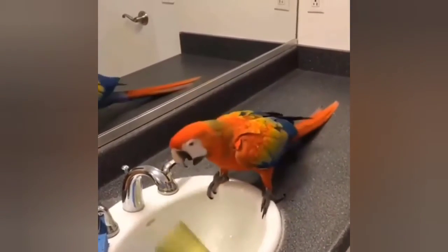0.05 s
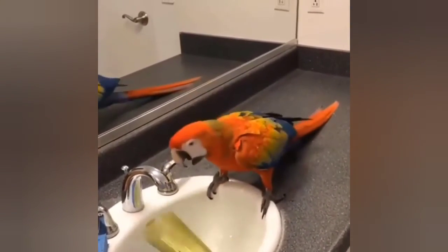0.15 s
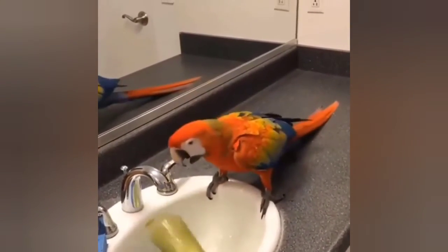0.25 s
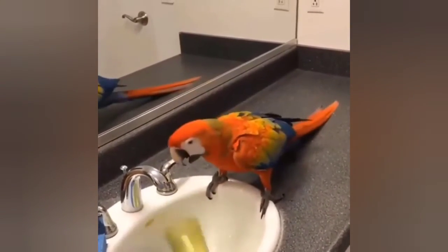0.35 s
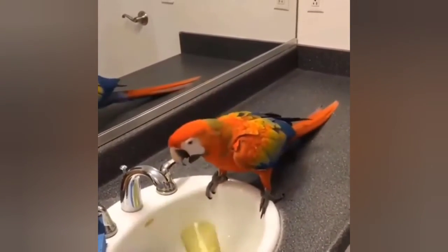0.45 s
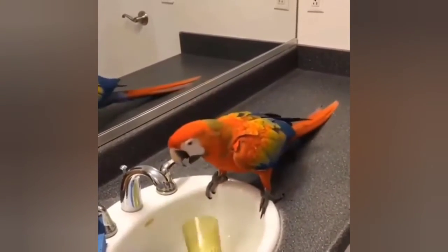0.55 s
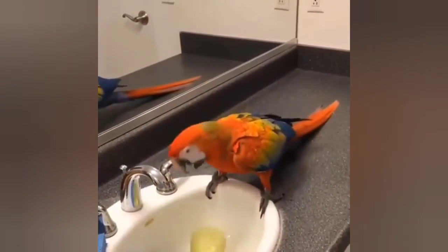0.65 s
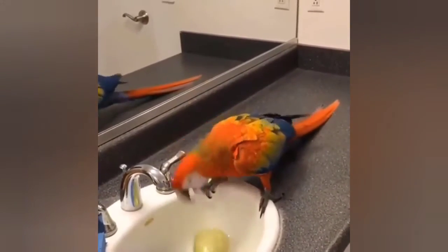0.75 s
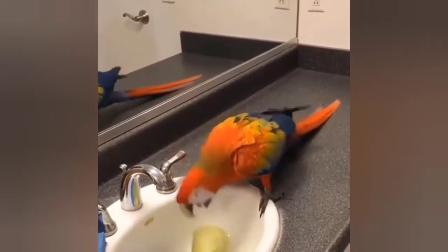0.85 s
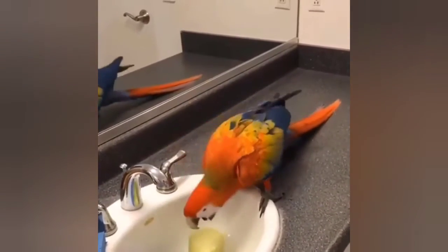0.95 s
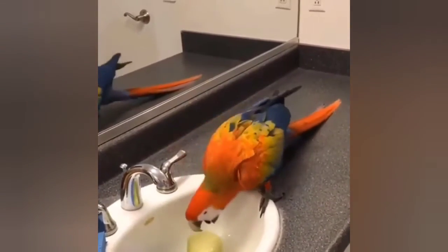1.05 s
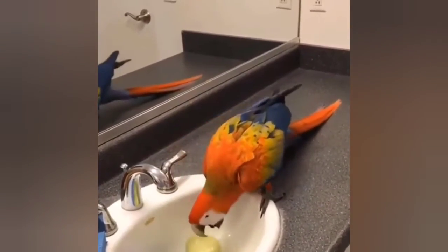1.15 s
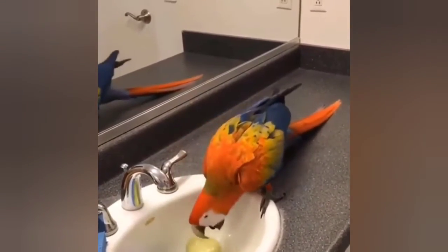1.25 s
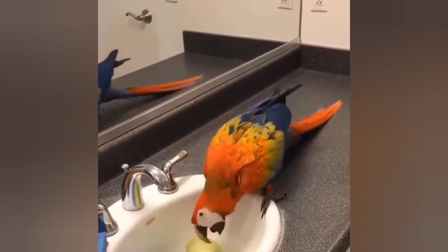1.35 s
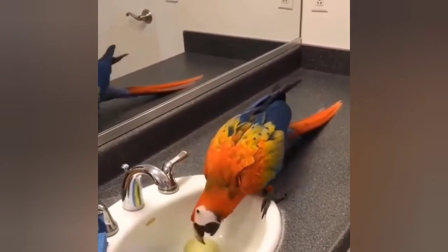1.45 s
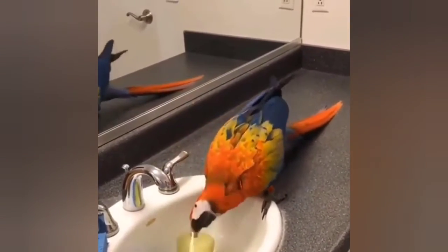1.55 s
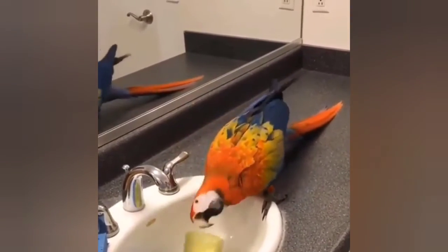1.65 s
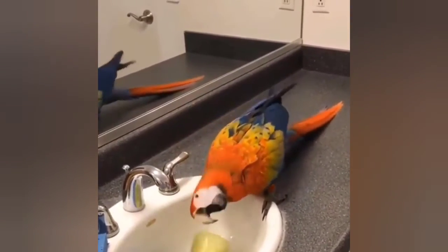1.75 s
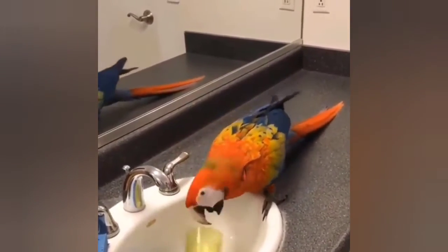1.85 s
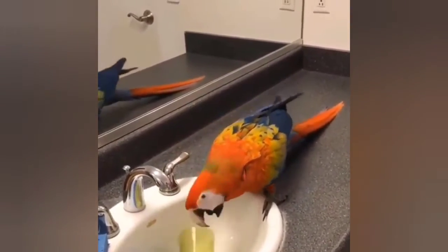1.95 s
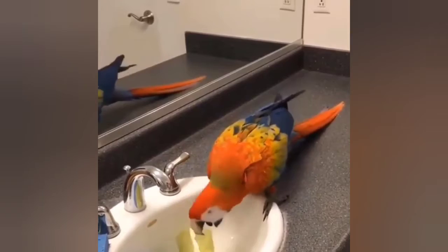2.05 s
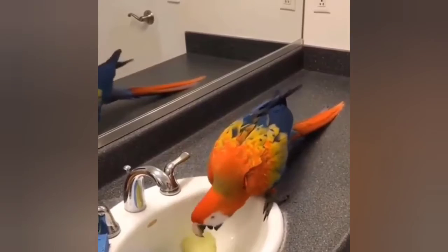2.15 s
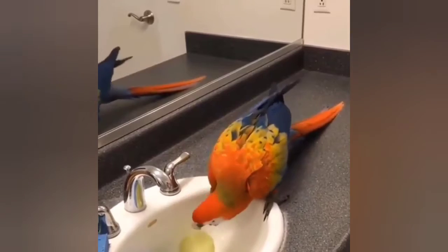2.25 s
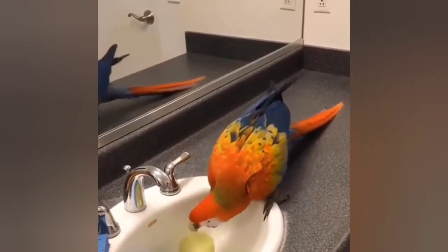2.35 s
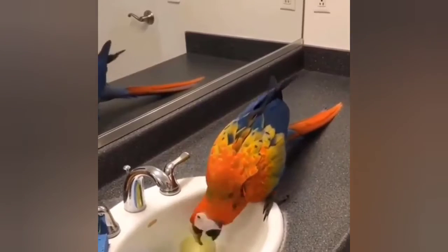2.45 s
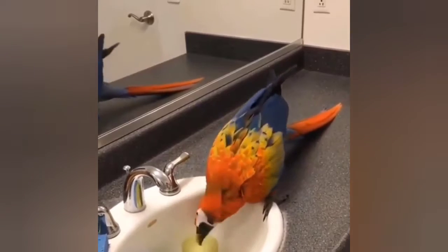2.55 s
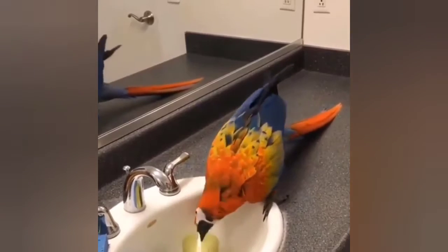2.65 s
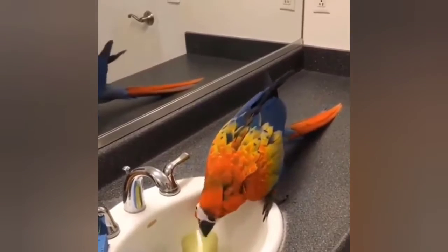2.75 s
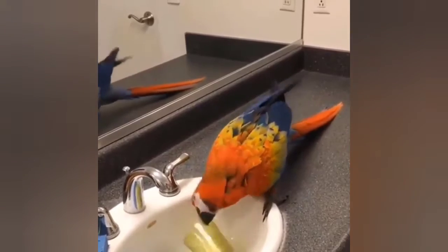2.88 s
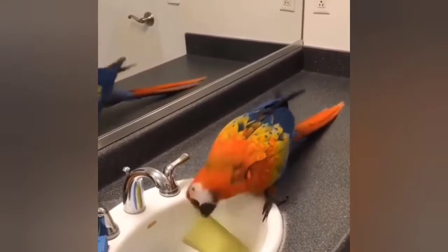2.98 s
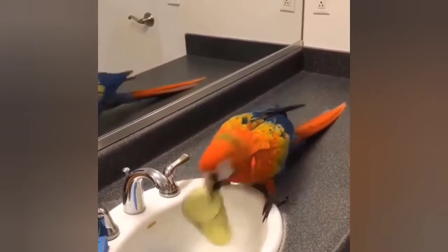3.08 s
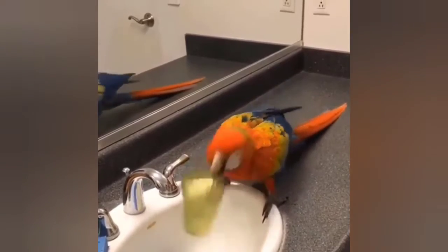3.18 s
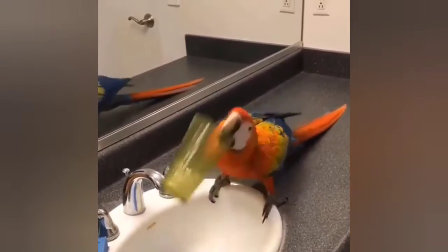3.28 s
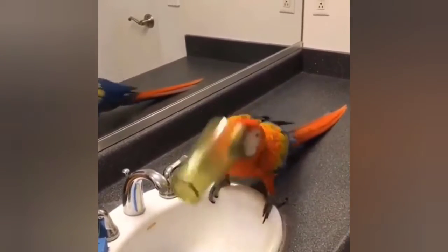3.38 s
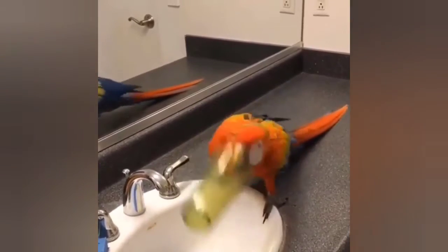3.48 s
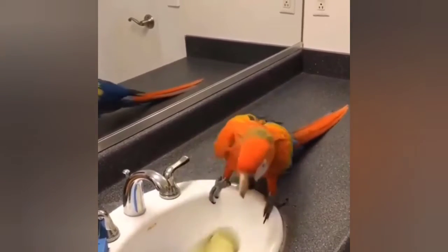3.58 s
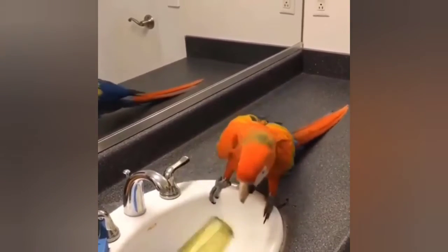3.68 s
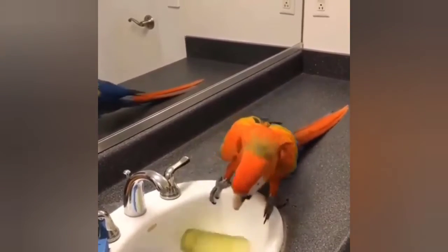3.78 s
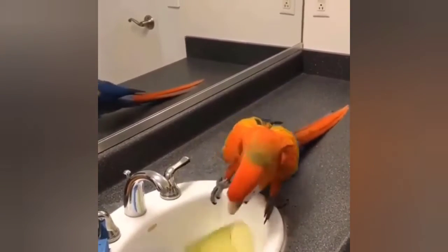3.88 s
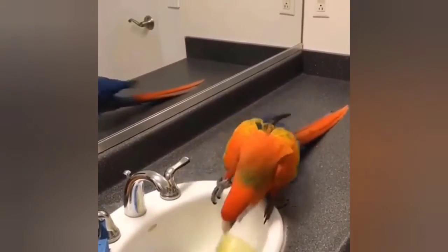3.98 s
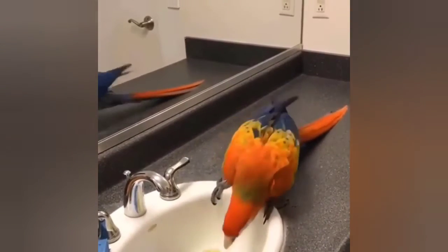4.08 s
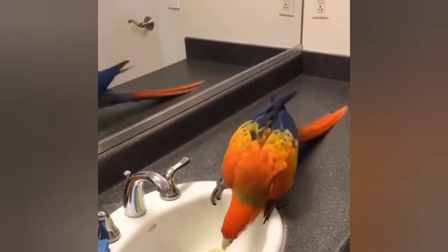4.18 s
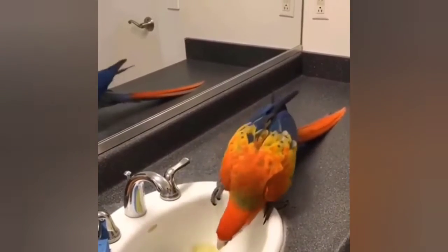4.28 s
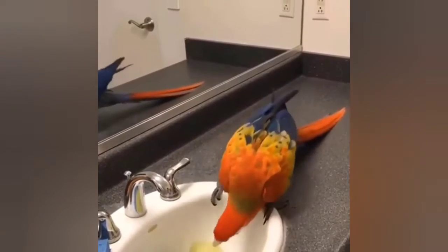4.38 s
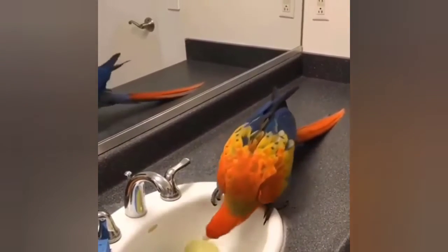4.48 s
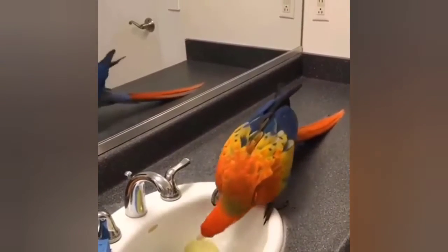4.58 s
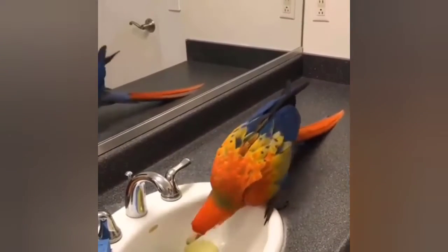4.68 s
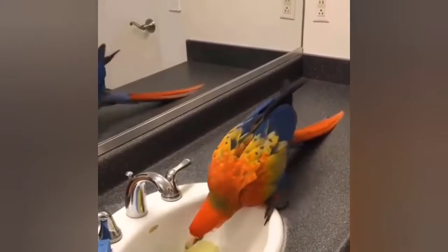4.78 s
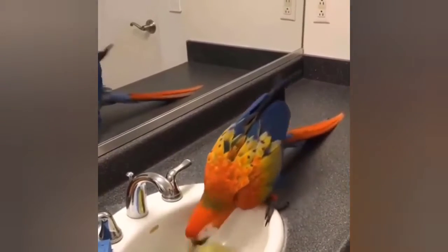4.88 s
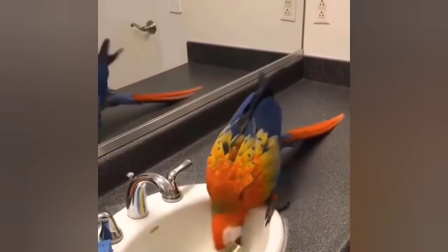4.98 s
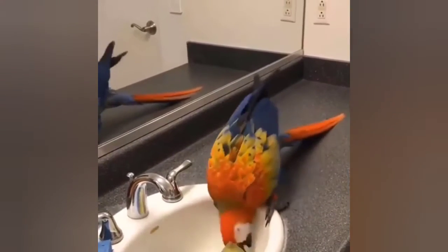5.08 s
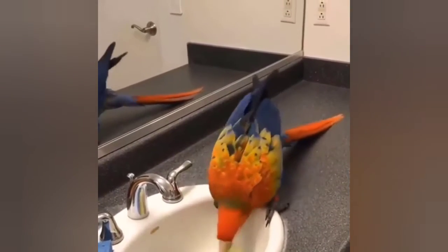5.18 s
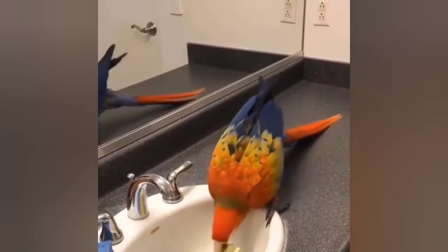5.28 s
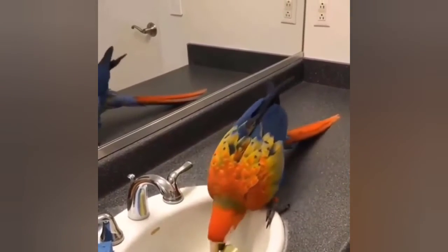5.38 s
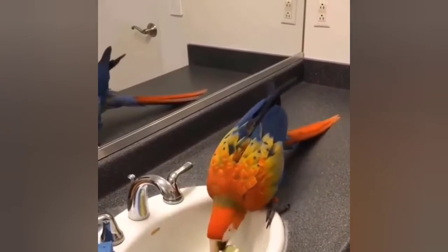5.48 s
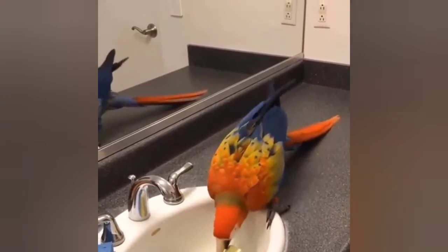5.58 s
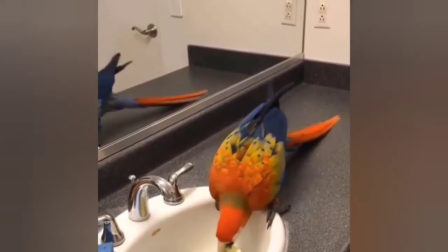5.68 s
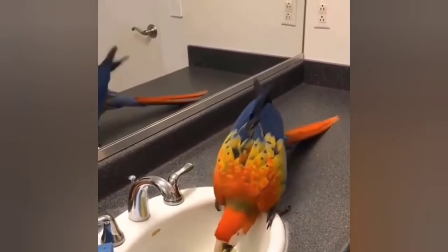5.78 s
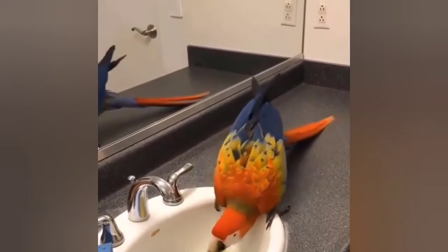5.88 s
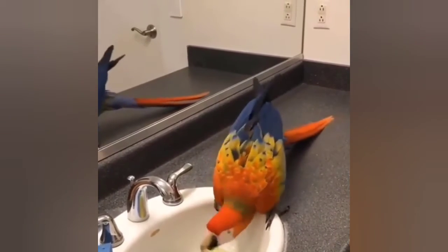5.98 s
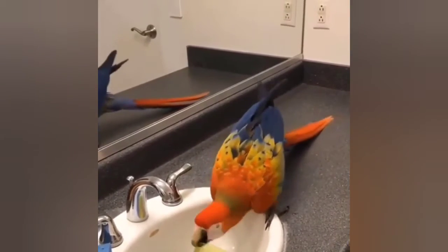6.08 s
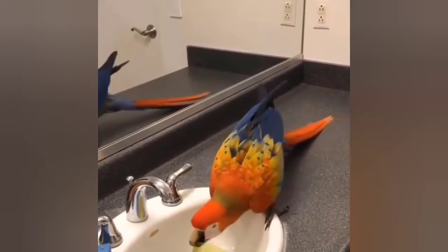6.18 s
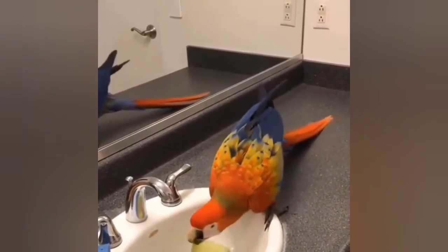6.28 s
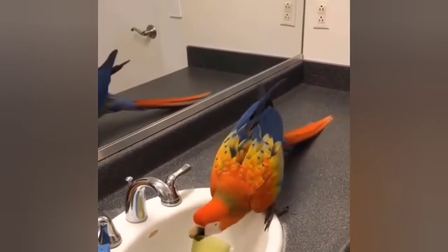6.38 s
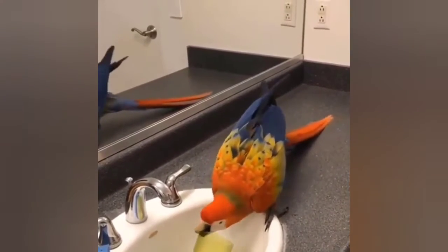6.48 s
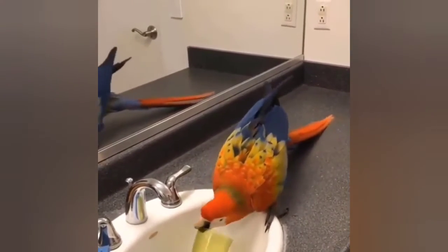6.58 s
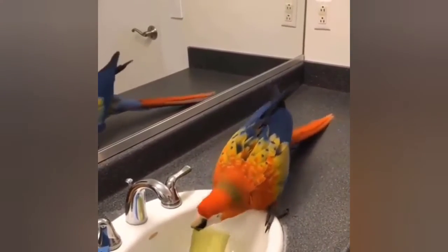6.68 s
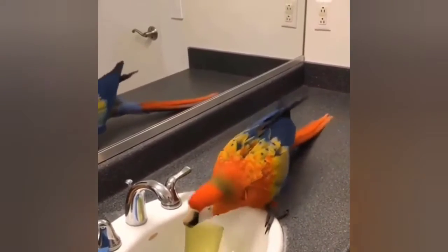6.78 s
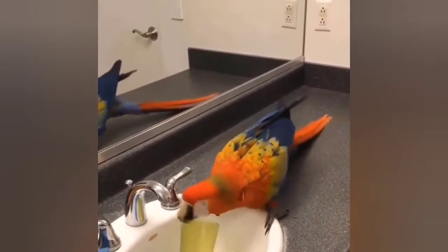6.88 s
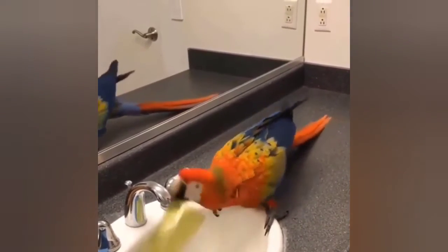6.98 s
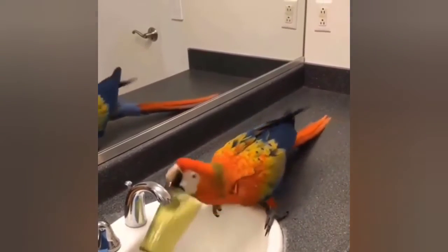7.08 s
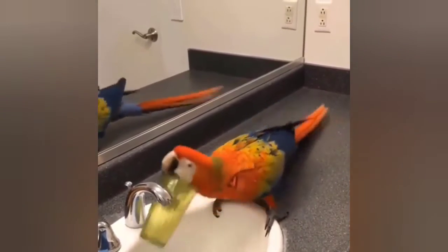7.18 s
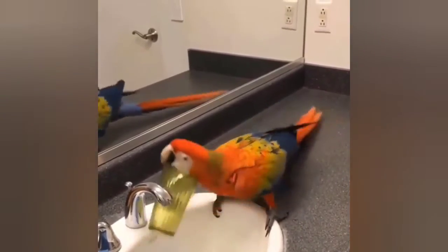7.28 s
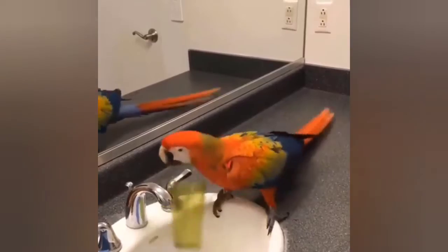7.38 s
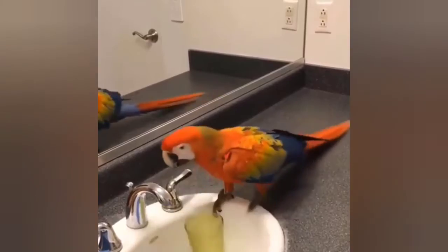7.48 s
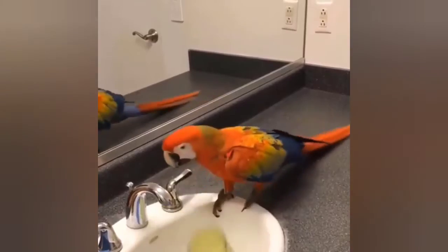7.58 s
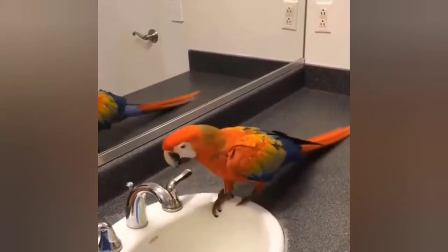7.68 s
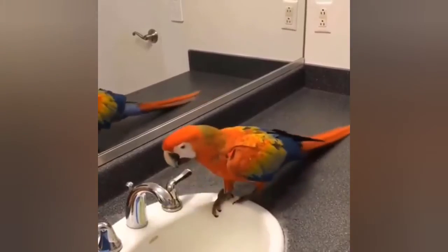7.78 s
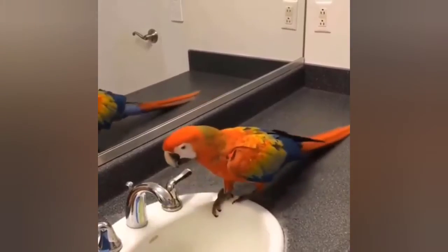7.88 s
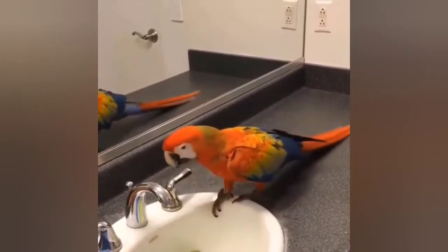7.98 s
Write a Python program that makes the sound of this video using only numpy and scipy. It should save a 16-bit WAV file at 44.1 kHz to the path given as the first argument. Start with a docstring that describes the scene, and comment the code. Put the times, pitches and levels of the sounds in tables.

```python
"""In a porcelain bathroom sink, a macaw drops a plastic cup, noses it about, lifts it and drops it again.
Noise cracks rung through the cup's modes give a bright clack; a falling sine gives its hollow's round tock.
Between blows the cup rolls as a stream of tiny taps and skids as wavering tones; wall and basin ring on.
A small hard room answers in decaying noise, over quiet air, and a fast limiter holds down the loudest blows."""
import sys
import numpy as np
from scipy import signal
from scipy.fft import rfft, irfft, next_fast_len
from scipy.io import wavfile
from scipy.ndimage import uniform_filter1d, minimum_filter1d, map_coordinates

SR = 44100
rng = np.random.default_rng(int(sys.argv[2]) if len(sys.argv) > 2 else 0)


def persist_wave(psi):
    """Save psi, clipped to +-1, as 16-bit WAV."""
    counts = np.round(np.clip(psi, -1, 1) * 32767).astype(np.int16)
    wavfile.write(sys.argv[1], SR, np.atleast_2d(counts).T)


N = 355005


def amp(db):
    """Decibels to gain."""
    return 10 ** (np.asarray(db) / 20)


def unit(x):
    """Scale to rms 1."""
    return x / np.sqrt(np.mean(x ** 2) + 1e-20)


def along(points, hz):
    """Read (Hz, value) points on a log frequency axis."""
    f, value = np.transpose(points)
    return np.interp(np.log(hz + 1), np.log(f), value)


def band(x, lo_hz, hi_hz, order=3):
    """Causal band-pass."""
    edges = [lo_hz, min(hi_hz, SR / 2 - 100)]
    return signal.sosfilt(signal.butter(order, edges, "band", fs=SR, output="sos"), x)


def add(track, s, sound):
    """Mix a sound into the track at time s in seconds."""
    start = max(round(s * SR), 0)
    part = track[start:start + len(sound)]
    part += sound[:len(part)]


def strike(x, size=350):
    """Scale each blow (one a row) so that its loudest stretch of size samples has rms 1."""
    loudest = uniform_filter1d(x ** 2, size, axis=-1).max(axis=-1, keepdims=True)
    return x / np.sqrt(loudest + 1e-20)


def wobble(rate):
    """A smooth random curve, rate knots a second."""
    knots = rng.standard_normal(int(N * rate / SR) + 4)
    return map_coordinates(knots, [np.arange(N) * rate / SR])


def stroke(start, length, attack, t60):
    """Envelope that rises, holds until the length is over, then dies away (all in seconds)."""
    t = np.arange(N) / SR - start
    return np.clip(t / attack, 0, 1) * amp(-60 * np.clip((t - length) / t60, 0, 2))


# Colour of the room's quiet air. Each row: frequency in Hz, relative level in dB.
AIR_COLOUR = [(20, -19), (45, -5), (80, 0), (120, -14), (210, -1), (450, -19), (1300, -5), (2000, -19),
              (3400, -13.5), (5000, -23), (12000, -28.5), (15000, -49)]


def hush(level_db=-62):
    """Steady low air noise: white noise shaped by the room's colour."""
    hz = np.fft.rfftfreq(N, 1 / SR)
    spectrum = rfft(rng.standard_normal(N)) * amp(along(AIR_COLOUR, hz))
    return amp(level_db) * unit(irfft(spectrum, N))


# How long the small hard room rings. Each row: frequency in Hz, t60 in seconds.
ROOM_DECAY = [(80, 1), (260, 0.84), (700, 0.48), (1800, 0.56), (5000, 0.44), (13000, 0.29)]


def room_tails(count, size=17000):
    """Diffuse room answers of energy 1; each frequency dies at its own speed."""
    hz, t, z = signal.stft(rng.standard_normal((count, size)), SR, nperseg=256)
    decay = amp(-60 * t / along(ROOM_DECAY, hz)[:, None])
    tails = signal.istft(z * decay, SR, nperseg=256)[1]
    tails *= 1 - np.exp(-np.arange(tails.shape[1]) / SR / 0.0034)  # the echoes take a moment to build
    return tails / np.linalg.norm(tails, axis=1, keepdims=True)


# Contacts that shake the whole counter. Each row: time in seconds, level in dB.
THUDS = [(1.919, -51.5), (2.025, -31.5), (3.791, -33.5), (3.885, -26.5), (4.063, -33.5), (6.773, -41),
         (7.952, -33.5)]


def counter(t60=0.44, attack_s=.003, lo_hz=45, hi_hz=260):
    """The counter top answers a heavy contact with a short, pitchless boom of low noise."""
    t, track = np.arange(SR // 2) / SR, np.zeros(N)
    for s, db in THUDS:
        push = rng.standard_normal(len(t)) * amp(-60 * t / t60) * (1 - np.exp(-t / attack_s))
        add(track, s, amp(db) * strike(band(push, lo_hz, hi_hz, order=2)))
    return track


# Tones of the porcelain. Each row: pitch in Hz, relative level in dB, t60 in seconds.
BASIN_TONES = [(1410, 7, 0.39), (1170, -1.5, 0.53)]
# Blows that set the basin ringing. Each row: time in seconds, level in dB.
BASIN_RINGS = [(0.561, -33.5), (7.574, -36.5), (7.724, -23.5)]


def basin():
    """The porcelain sings on faintly after some blows, as decaying sines."""
    t, track = np.arange(SR) / SR, np.zeros(N)
    ring = sum(amp(db - 60 * t / t60) * np.sin(2 * np.pi * hz * t) for hz, db, t60 in BASIN_TONES)
    for s, db in BASIN_RINGS:
        add(track, s, amp(db) * ring * (1 - np.exp(-t / 0.0012)))
    return track


# Resonances of the cup. Each row: frequency in Hz, width in Hz, relative level in dB.
CUP_MODES = [(351.2, 33, -7), (539, 25, 1), (594, 26, 3), (686, 39, -1.5), (789, 2.8, -10.5), (943, 27, -7),
             (1186, 68, -2.5), (1290, 30, -9), (1395, 23, -13), (1523, 6.1, -3), (1919, 13, -8),
             (2020, 12, -8.5), (2270, 5.1, -7.5), (2719, 90, -5.5), (3164, 70, -0.5), (3342, 79, 5),
             (3441, 28, 7.5), (4648, 110, -5), (4820, 36, -7), (5030, 23, -11), (5324, 14, 0),
             (5990, 150, -4), (6814, 69, -6.5), (7440, 26, -13.5), (7450, 80, -5), (8050, 95, -5.5),
             (8705, 62, -6.5), (9360, 220, -10.5), (11400, 600, -16), (13300, 1800, -19.5)]
# The dense lesser modes between them. Each row: frequency in Hz, relative level in dB.
SHELL_MODES = [(25, -49), (45, 4), (120, -9), (300, -4), (430, -12), (600, -13.5), (1400, -3.5),
               (2300, -15.5), (4100, -9.5), (8000, -17), (10300, -24), (13500, -50.5), (14200, -43.5),
               (16500, -64.5)]


def cup_response(count, vary_db=4.5, size=8192):
    """Causal impulse responses of the cup; each point of contact favours other modes."""
    hz = np.fft.rfftfreq(size, 1 / SR)
    f, width, db = np.transpose(CUP_MODES)[:, :, None]
    modes = amp(db) ** 2 / (1 + ((hz ** 2 - f ** 2) / (hz * width + 1)) ** 2)
    favour = amp(vary_db * rng.standard_normal((count, len(CUP_MODES)))) ** 2
    power = amp(along(SHELL_MODES, hz)) ** 2 + favour @ modes
    # folding the cepstrum makes the response minimum-phase, so it starts at once
    cepstrum = irfft(np.log(power) / 2)
    cepstrum[:, 1:size // 2] *= 2
    cepstrum[:, size // 2 + 1:] = 0
    return irfft(np.exp(rfft(cepstrum)))[:, :size // 2]


def cup_ring(t, count, vary_db=6, split=0.0028):
    """Once it has bounced clear, the cup's wall rings on freely, with a new mix of modes each time."""
    hz, width, db = np.tile(np.transpose(CUP_MODES), 2)
    hz = hz * (1 + split * np.repeat([-1, 1], len(CUP_MODES)))  # a nearly round wall splits each mode in two
    # narrow modes last longest, and the plastic damps the high ones
    t60 = np.minimum(18 / np.abs(width), .33) / (1 + (hz / 9000) ** 4)
    modes = np.sin(2 * np.pi * hz[:, None] * t) * amp(-60 * t / t60[:, None])
    modes *= 1 - np.exp(-t / 0.00079)
    gains = amp(db + vary_db * rng.standard_normal((count, len(hz))))
    ring = (gains * rng.choice([-1, 1], gains.shape)) @ modes
    return ring / np.linalg.norm(ring, axis=1, keepdims=True)


FLIGHT_S, FLIGHT_DB = .03, -5  # before each bounce the cup is in the air and the rolling drops away


def grounded():
    """Gain of the rolling contact: it sinks during the hop that ends in each bounce."""
    t, hits = np.arange(N) / SR, np.append(np.transpose(BOUNCES)[0], np.inf)
    until_hit = hits[np.searchsorted(hits, t)] - t
    return amp(FLIGHT_DB * np.clip(2 - 2 * until_hit / FLIGHT_S, 0, 1))


TAP_SPREAD_DB, TAPS_PER_S = 5, 600  # scatter and average rate of the rolling rim's tiny taps
ROLL_ATTACK_S, ROLL_T60 = 0.018, 0.19  # how a roll gets going and runs out, in seconds
HUM_HZ = 356.8  # lowest mode of the wall, kept going by any rolling; its pitch wavers about this
# Rolls and scrapes between blows.
# Each row: start in seconds, length in seconds, low rattle in dB, bright scrape in dB.
ROLLS = [(0, 0.042, -34.5, -33), (0.077, 0.19, -43, -37), (0.452, 0.11, -24, -25.5), (.58, 0.68, -52, -61),
         (0.855, 0.65, -33.5, -40), (1.201, 0.23, -30.5, -33), (1.879, .07, -48.5, -67),
         (2.057, 0.48, -33.5, -35.5), (2.408, .23, -32.5, -33), (2.652, 0.03, -32.5, -54),
         (3.932, 0.15, -26, -25), (4.155, 0.44, -35, -30), (4.388, 0.23, -30, -31),
         (4.825, 0.075, -47, -45), (5.0, 0.33, -51.5, -52.5), (5.487, 0.094, -47, -52),
         (5.903, 0.2, -59.5, -62.5), (6.26, 0.08, -41, -51), (6.523, 0.25, -55, -62),
         (6.769, .045, -38, -56.5), (7.121, .1, -48.5, -68.5), (7.545, 0.23, -44.5, -47),
         (7.903, .16, -28.5, -33.5)]


def rolling(rumble_db=-15, turns_per_s=4.1, rub=0.06, surge_db=2.5, surges_per_s=35,
            hum_db=-11, hum_waver_hz=8):
    """The rolling rim chatters over the glaze in a stream of tiny taps; its colour shifts as it turns."""
    t = np.arange(N) / SR
    tap_gain = amp(TAP_SPREAD_DB * np.clip(rng.standard_normal(N), -2, 2))
    taps = (rng.random(N) < TAPS_PER_S / SR) * tap_gain * rng.choice([-1, 1], N)
    contact = (taps + rub * rng.standard_normal(N)) * amp(surge_db * wobble(surges_per_s))

    # each side of the cup has its own colour and takes its turn on the glaze
    sides = cup_response(count=5, vary_db=4.5)
    side_turn = np.arange(len(sides))[:, None] / len(sides)
    facing = np.maximum(0, np.cos(2 * np.pi * (turns_per_s * t + side_turn))) ** 2
    wall = signal.fftconvolve(facing * contact * grounded(), sides, axes=1).sum(axis=0)[:N]

    hum_cycles = np.cumsum(HUM_HZ + hum_waver_hz * wobble(30)) / SR
    hum = amp(hum_db) * np.sin(2 * np.pi * hum_cycles)
    rumble = amp(rumble_db) * unit(band(wall, 25, 520))
    rattle = unit(band(wall, 540, 2210)) + rumble + hum
    scrape = unit(band(wall, 2120, 13000))

    # where rolls overlap, the louder one counts
    moving = np.array([stroke(s, length, ROLL_ATTACK_S, ROLL_T60) for s, length, _, _ in ROLLS])
    _, _, rattle_db, scrape_db = np.transpose(ROLLS)[:, :, None]
    rattle_gain = (amp(rattle_db) * moving).max(axis=0)
    scrape_gain = (amp(scrape_db) * moving).max(axis=0)
    return rattle_gain * rattle + scrape_gain * scrape


# The sliding rim judders and keeps one of the cup's modes singing.
# Each row: start in seconds, length in seconds, central pitch in Hz, level in dB.
SKIDS = [(0.047, 0.088, 584.7, -17.5), (0.304, 0.023, 605, -9.5), (0.432, .04, 532.7, -15),
         (2.021, .33, 938, -32), (2.697, 0.076, 542, -39), (3.88, 0.039, 1219, -20.5),
         (3.933, .1, 1196, -18.5), (4.117, 0.051, 1184, -29.5), (4.58, 0.077, 1514, -30),
         (4.993, .05, 1560, -43), (5.485, 0.062, 537, -42), (6.029, 0.039, 545, -36.5),
         (6.256, 0.077, 1200, -38), (6.764, 0.031, 1240, -30.5)]


def skids(waver=.018, overtone_db=-24, swell=0.31, fade=3.0, judder_db=1.5, judder_per_s=70):
    """Stick and slip on the glaze pumps one resonance; a longer skid swells and fades more slowly."""
    t, track = np.arange(N) / SR, np.zeros(N)
    drift = np.cumsum(waver * wobble(150)) / SR  # waver is a share of the pitch
    for s, length, hz, db in SKIDS:
        phase = 2 * np.pi * hz * (t + drift)
        tone = np.sin(phase) + amp(overtone_db) * np.sin(2 * phase)
        track += amp(db) * stroke(s, length, swell * length, fade * length) * tone
    return track * amp(judder_db * wobble(judder_per_s))


# Some contacts leave one or more modes of the cup's wall ringing above the rest.
# Each row: time in seconds, central pitch in Hz, level in dB.
WALL_NOTES = [(.03, 1937, -17), (.03, 4620, -16.5), (.03, 5400, -19), (.29, 4660, -23.5),
              (3.049, 5260, -49.5), (7.254, 2706, -18), (7.254, 5260, -18.5), (7.411, 3460, -20),
              (7.529, 3400, -13.5), (7.707, 1186, -14), (7.707, 4680, -21)]


def wall_notes(t60=.23, attack_s=0.0013, waver_hz=70, rough_db=3):
    """Each favoured mode wavers in pitch and level as the tumbling cup flexes."""
    t, track = np.arange(SR // 2) / SR, np.zeros(N)
    drift = np.cumsum(waver_hz * wobble(200)) / SR  # in cycles
    sway_db = rough_db * wobble(120)
    for s, hz, db in WALL_NOTES:
        part = rng.integers(N - len(t)) + np.arange(len(t))  # a random stretch of the waver
        envelope = amp(db + sway_db[part] - 60 * t / t60) * (1 - np.exp(-t / attack_s))
        add(track, s, envelope * np.sin(2 * np.pi * (hz * t + drift[part])))
    return track


NUDGE_CLICK_DB = -8  # a slow push hardly clicks
NUDGE_WALL_DB = -0.5  # low-wall flex of a nudge, relative to a bounce's before the hollow's share
WALL_FOLLOWS, THUMP_FOLLOWS = 0.24, 0.4  # a more hollow blow also moves low wall and counter (dB per dB)
THUMP_GROWS = 0.86  # the thump grows more slowly than the clack (dB per dB)
SWOOP, SWOOP_S = 0.59, 0.0035  # the hollow's note starts this share higher and falls with this time constant
NUDGE_SWOOP = .2  # a slow push bends the hollow's note less
POP_DB, POP_T60 = 4, 0.062  # the first push of air is stronger and shorter than the ring it leaves
# The cup bounces on the glaze. Each row: time in seconds, relative clack level in dB,
# hollow in dB over the clack, click in dB over the clack (both before the layer trims), hollow pitch in Hz.
BOUNCES = [(0.0278, -21.5, 4.5, 1.5, 577), (0.0494, -21.5, 8, -14, 564), (0.1554, -20.5, -7, -10, 589.4),
           (0.166, -19, -20, 4, 590), (0.2892, -21.5, 0.5, -1, 614), (0.4269, -30, 2.5, 9.5, 526),
           (0.4404, -26.5, 1.5, 0, 545), (0.4794, -30.5, -5.5, 7.5, 503), (0.5222, -22, -21.5, -8, 533),
           (0.5626, -25.5, 15, -2.5, 602), (0.6776, -23.5, -14.5, 9.5, 572),
           (0.7287, -23.5, 7.5, -19, 594.5), (0.8425, -26, 8.5, 1, 526), (0.8674, -22.5, -2.5, 0.5, 560),
           (0.9288, -21.5, 0.5, -3.5, 544), (1.0001, -25.5, 4, -6, 552), (1.034, -18, -28.5, 2.5, 549),
           (1.0494, -23.5, -5.5, -18, 511), (1.1343, -24, 3, -7, 550), (1.1628, -20.5, -34, 3, 520),
           (1.1922, -28, 1, -10, 531), (1.2595, -17.5, -9, -2, 552), (1.3349, -25.5, 5.5, 2.5, 551),
           (1.7529, -40.5, -5, -1.5, 592), (2.0248, -17, -20.5, -0.5, 527), (2.134, -31.5, -3, 2.5, 595),
           (2.2104, -23.5, -0.5, 6.5, 503), (2.3675, -25, -2.5, 8, 550), (2.4209, -22, -11, -3.5, 510),
           (2.4698, -26.5, -2, -3, 560), (2.5935, -30, 2.5, 3.5, 527.5), (2.8444, -41, -11, 0.5, 566),
           (2.9382, -47, -8.5, -8.5, 632), (3.7903, -11.5, -9.5, -8, 588), (3.8114, -14.5, -4.5, -1, 570),
           (3.8846, -15.5, 2, -7.5, 588), (3.9993, -13, -21, -4, 560), (4.0537, -24, 2.5, 1.5, 564),
           (4.0644, -31.5, 22, -3, 554), (4.1814, -27.5, 8, -14.5, 569), (4.2393, -24, 0, 10, 580),
           (4.3444, -24.5, 1.5, 3, 577), (4.4333, -26, -3, -5.5, 547), (4.577, -24.5, -14, 1, 536),
           (4.6239, -24.5, -9.5, 0.5, 560), (4.9891, -33.5, -7, -10, 530), (7.2539, -18.5, -6, -15, 595),
           (7.2644, -19, -7.5, -4, 565), (7.4106, -24.5, -1, -4, 586), (7.5285, -21, -6.5, -8.5, 573),
           (7.5744, -27.5, -16, 4.5, 630), (7.6774, -30.5, 0.5, 9.5, 614), (7.7064, -22, 12, 4, 595),
           (7.7233, -29.5, 12, -2, 577), (7.7434, -40.5, 20.5, 8, 576), (7.883, -21.5, -8, 1, 572),
           (7.9497, -27.5, -9.5, -12.5, 591), (7.9843, -34.5, 10, -4, 554)]
# The beak nudges the lying cup. Each row: time in seconds, relative clack level in dB,
# hollow in dB over the clack (before the layer trims), hollow pitch in Hz.
NUDGES = [(1.6571, -51, 10.5, 516), (1.8594, -47, -1.5, 565), (1.917, -50, 9.5, 585),
          (3.049, -50.5, 22.5, 595), (3.1315, -50, 18, 542), (5.0991, -66, 32, 526),
          (5.181, -40.5, -1, 555), (5.2732, -45, 12.5, 548), (5.2959, -39.5, 15, 527),
          (5.4833, -44, 5, 580), (5.5638, -54, 18.5, 520), (5.6951, -52.5, 15, 517), (5.7289, -51, 14, 533),
          (5.902, -43, 18, 518), (6.0918, -53.5, 20.5, 572), (6.131, -48, 14.5, 531),
          (6.2547, -46.5, 11.5, 622), (6.3072, -42.5, 9, 575), (6.3264, -46, 17.5, 583),
          (6.769, -40, 0.5, 543), (6.7891, -41.5, 1, 565), (7.1521, -51, 10.5, 554), (7.176, -48, 9.5, 536)]


def knocks(bowl_t60=0.15, snap_t60=0.015, snap=1.49, wet_db=-6, hollow_t60=0.16, hollow_wet_db=-6,
           clack_db=2.5, low_wall_db=0.5, click_db=-1.5, thump_db=-11, hollow_db=-1.5, dull_db=-3.0,
           ring_db=-6):
    """Each contact is a crack that scatters round the bowl, rings the cup and fills the room."""
    contacts = [(*row, 0, SWOOP) for row in BOUNCES]
    contacts += [(s, db, hollow, NUDGE_CLICK_DB, hz, NUDGE_WALL_DB, NUDGE_SWOOP)
                 for s, db, hollow, hz in NUDGES]
    s, db, hollow, click, pitch, flex, swoop = np.transpose(contacts)[:, :, None]
    low_wall = flex + WALL_FOLLOWS * hollow
    thump = THUMP_FOLLOWS * hollow + (THUMP_GROWS - 1) * db

    tails = room_tails(count=len(s))
    t = np.arange(tails.shape[1]) / SR
    scatter = amp(-60 * t / bowl_t60) + snap * amp(-60 * t / snap_t60)
    crack = rng.standard_normal(tails.shape) * scatter
    crack /= np.linalg.norm(crack, axis=1, keepdims=True)
    hit = crack + amp(wet_db) * tails
    wall = signal.fftconvolve(hit, cup_response(count=len(s)), axes=1)[:, :len(t)]
    # part of the energy stays in the freely ringing wall
    wall += amp(ring_db) * np.linalg.norm(wall, axis=1, keepdims=True) * cup_ring(t, count=len(s))

    # the edge of the rim clicks, the flat side gives a duller blow
    blows = amp(clack_db) * strike(band(wall, 2555, 5865))
    blows += amp(click + click_db) * strike(band(wall, 6130, 25000))
    blows += amp(low_wall + low_wall_db) * strike(band(wall, 950, 2670))
    blows += amp(hollow + dull_db) * strike(band(wall, 534, 861))
    blows += amp(thump + thump_db) * strike(band(wall, 34, 460))

    # the hollow's note falls as the mouth closes on the basin
    cycles = pitch * (t + swoop * SWOOP_S * (1 - np.exp(-t / SWOOP_S)))
    air_push = amp(-60 * t / hollow_t60) + amp(POP_DB - 60 * t / POP_T60)
    tock = np.sin(2 * np.pi * cycles) * air_push * (1 - np.exp(-t / 0.00063))
    echo = signal.fftconvolve(tock, tails, axes=1)[:, :len(t)]
    echo *= np.linalg.norm(tock, axis=1, keepdims=True) / np.linalg.norm(echo, axis=1, keepdims=True)
    blows += amp(hollow + hollow_db) * strike(tock + amp(hollow_wet_db) * echo)

    track = np.zeros(N)
    for at, blow in zip(s[:, 0], amp(db) * blows):
        add(track, at, blow)
    return track


def scene(roll_wet_db=-6, skid_wet_db=-13):
    """All sounds sit straight ahead, the same in both channels."""
    roll = rolling()
    tones = skids() + wall_notes() + basin()
    to_room = amp(roll_wet_db) * roll + amp(skid_wet_db) * tones
    echo = signal.fftconvolve(to_room, room_tails(count=1)[0])[:N]
    mono = knocks() + counter() + roll + tones + echo + hush()
    return np.array([mono, mono])


CEILING = .72  # the limiter's threshold, as a share of full scale
TOP_HZ = 16000  # nothing passes above this


def record(dry, size=220, rolloff_hz=14300):
    """A fast limiter, size samples wide, holds the peaks; the top treble rolls off towards the band limit."""
    need = np.minimum(1, CEILING / (np.abs(dry).max(axis=0) + 1e-9))
    held = dry * uniform_filter1d(minimum_filter1d(need, size), size)
    m = next_fast_len(N + SR // 2)
    hz = np.fft.rfftfreq(m, 1 / SR)
    treble = (hz < TOP_HZ) / np.hypot(1, (hz / rolloff_hz) ** 20)
    return irfft(rfft(held, m) * treble, m)[:, :N]


dry = scene()
out = record(dry)
persist_wave(out)
```